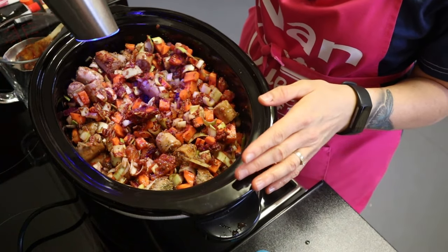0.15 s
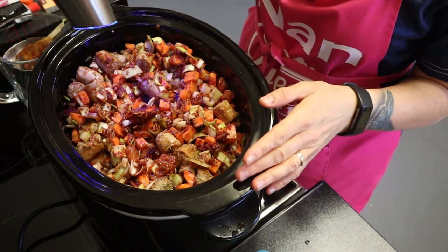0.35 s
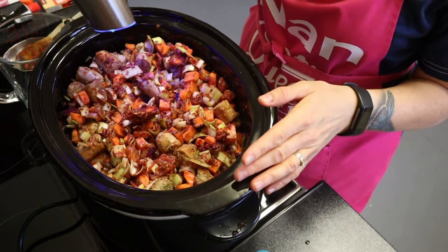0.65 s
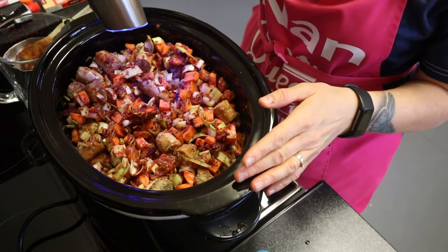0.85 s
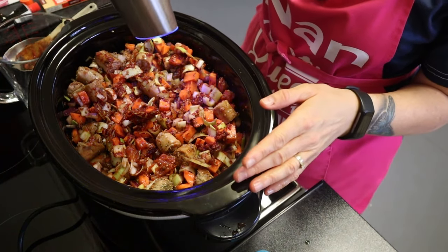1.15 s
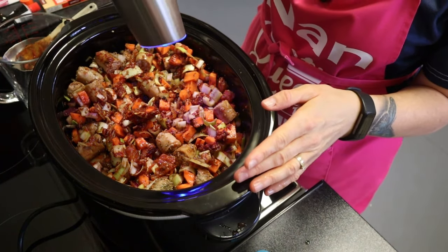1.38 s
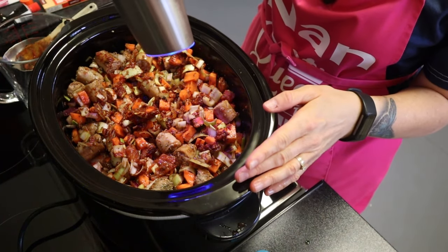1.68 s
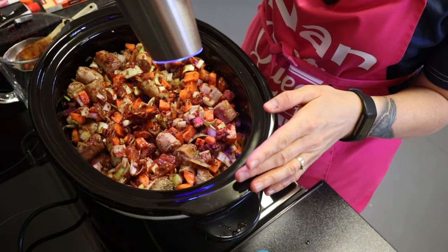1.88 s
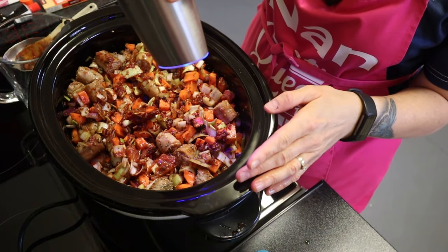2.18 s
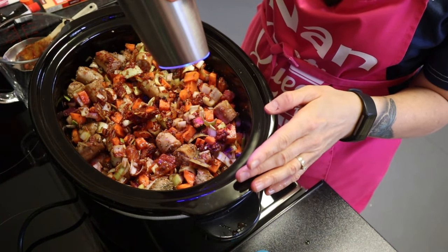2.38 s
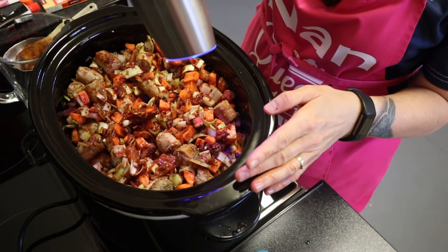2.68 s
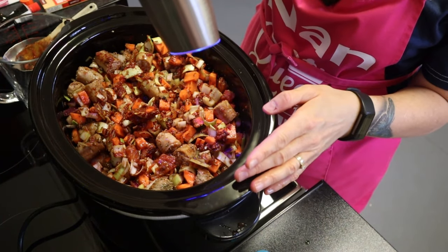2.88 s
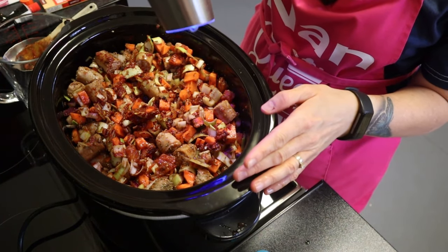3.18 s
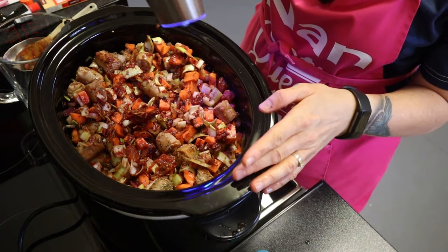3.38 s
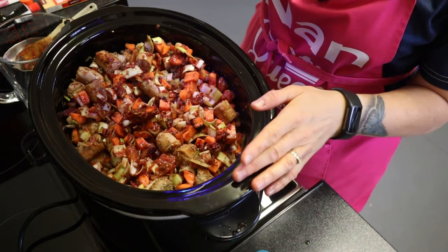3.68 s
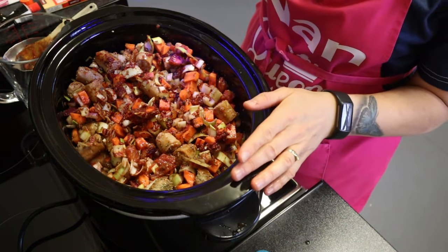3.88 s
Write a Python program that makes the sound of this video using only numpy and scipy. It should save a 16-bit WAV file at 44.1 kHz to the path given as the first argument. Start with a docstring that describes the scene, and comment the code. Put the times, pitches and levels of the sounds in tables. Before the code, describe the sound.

A battery pepper grinder whirs steadily up close, its rough motor whine wavering and sagging under load while peppercorns rasp, crackle and crack.

```python
"""A battery pepper grinder runs over a pot in a kitchen, close to a mono microphone.
From the start a small motor hums, gears whine and rattle the housing, and the burr rasps over faint room noise.
The first corn cracks just before half a second. From about 1.1 to 1.8 s the load drags the pitch down deeply,
and slipping gears jolt the housing, jammed corns squeal and more corns crack. The motor recovers, one last
corn cracks near 2.5 s, the pitch sags again around 3 s, and the motor is turning fast at the end."""
import sys
import numpy as np
from scipy import signal
from scipy.fft import rfft, irfft, next_fast_len
from scipy.io import wavfile
from scipy.ndimage import uniform_filter1d

SR = 44100
rng = np.random.default_rng(int(sys.argv[2]) if len(sys.argv) > 2 else 0)


def generate_wav(signal):
    """Clip the signal to [-1, 1] and save it as 16-bit WAV at the path in sys.argv[1]."""
    frames = np.transpose(np.atleast_2d(signal))
    scaled = np.clip(frames, -1, 1) * 32767
    pcm = np.round(scaled).astype(np.int16)
    wavfile.write(sys.argv[1], SR, pcm)


N = 178153
TIME = np.arange(N) / SR
GEAR_RATIO, GEAR_TEETH = 4 / 9, 15  # gear turns per shaft turn, teeth on that gear


def undb(db):
    """Turn decibels into a gain."""
    return 10 ** (np.asarray(db) / 20)


def unit(x):
    """Scale a sound to an average (rms) level of 1."""
    return x / np.sqrt(np.mean(x ** 2))


def curves(table):
    """Join the points of each column of a (time [s], ...) table with straight lines."""
    times, *columns = np.transpose(table)
    return [np.interp(TIME, times, column) for column in columns]


def response(hz, points):
    """Look up the level [dB] that a (frequency [Hz], level [dB]) table gives to a moving tone."""
    table_hz, db = np.transpose(points)
    return np.interp(np.log(hz), np.log(table_hz), db)


def walk(hz):
    """Drift at random around zero with spread 1, mostly slower than hz."""
    size = next_fast_len(N, real=True)
    f = np.fft.rfftfreq(size, 1 / SR)
    spectrum = rfft(rng.standard_normal(size)) / (1 + (f / hz) ** 2)
    return unit(irfft(spectrum, size)[:N])


def hold(start, length):
    """Rise, hold and let go, with 0.021 s ramps centred on the start and the end."""
    distance_inside = np.minimum(TIME - start, start + length - TIME)
    return np.clip(distance_inside / 0.021 + 0.5, 0, 1)


def swell(centre, length):
    """Rise and fall smoothly; the length is taken at half height."""
    return np.cos(np.pi / 2 * np.clip((TIME - centre) / length, -1, 1)) ** 2


def colour(x, points, size=4096):
    """Filter to a (frequency [Hz], level [dB]) spectrum, with no sound ahead of its cause."""
    hz, db = np.transpose(points)
    f = np.fft.rfftfreq(size, 1 / SR) + 1
    gain = undb(np.interp(np.log(f), np.log(hz), db))
    # folding the cepstrum (the spectrum of the log gain) puts the response as early as possible
    cepstrum = irfft(np.log(gain))
    cepstrum[1:size // 2] *= 2
    cepstrum[size // 2 + 1:] = 0
    impulse_response = irfft(np.exp(rfft(cepstrum)))
    return signal.fftconvolve(x, impulse_response)[:N]


def ring(x, modes):
    """Ring resonances side by side, each a narrow filter used twice to steepen it."""
    out = 0
    for hz, width_hz, db in modes:
        b, a = signal.iirpeak(hz, hz / width_hz, fs=SR)
        once = signal.lfilter(b, a, x)
        out = out + undb(db) * signal.lfilter(b, a, once)
    return out


def clicks(times, sizes):
    """Place impulses, each shared between its two nearest samples."""
    place = np.clip(times * SR, 0, N - 2)
    i = place.astype(int)
    later_share = place - i
    return np.bincount(i, sizes * (1 - later_share), N) + np.bincount(i + 1, sizes * later_share, N)


def grains(per_s, spread_db):
    """Scatter tiny fractures at random: many small, a few large."""
    size = np.minimum(rng.standard_exponential(N), 4)
    happens = rng.random(N) < per_s / SR
    return happens * undb(spread_db * size) * rng.choice([-1, 1], N)


def tone(cycles, rough, flutter_hz):
    """Sound a pitch whose strength and phase flutter at random."""
    flutter = 1 + rough * (walk(flutter_hz) + 1j * walk(flutter_hz))
    return unit(np.imag(flutter * np.exp(2j * np.pi * (cycles + rng.random()))))


def room(x, wet_db, t60=0.45, count=7):
    """Add the short tail of pot and walls, crossfading between count tails as the hand moves."""
    t = TIME[:SR // 3]
    out = x
    for k, draw in enumerate(rng.standard_normal((count, len(t)))):
        tail = draw * np.exp(-np.log(1000) * t / t60) * (t > .002)
        tail = tail / np.linalg.norm(tail)
        share = np.sqrt(np.clip(1 - np.abs(np.linspace(0, count - 1, N) - k), 0, 1))
        out = out + undb(wet_db) * signal.fftconvolve(x * share, tail)[:N]
    return out


def burr_load(shaft_hz):
    """Pepper's drag holds the speed down and is greatest while the motor is still slowing."""
    free_hz, sag_hz, inertia_s = 233.5, 67.7, 0.061  # a steady sag of sag_hz below free_hz is load 1
    slowing = -uniform_filter1d(np.gradient(shaft_hz) * SR, size=SR // 16)
    return (free_hz - shaft_hz + inertia_s * slowing) / sag_hz


def loaded(free_db, added_db, load):
    """Give a part's level [dB]: its level running free plus what full load adds."""
    return free_db + added_db * load


# hum of the unbalanced shaft: (shaft speed [Hz], level [dB])
HUM_LEVEL = [(175, -65.5), (205, -61.5), (230, -55)]
# motor's magnetic pull, set by its mount: (pitch [Hz], level before the slow drift [dB])
COGGING_LEVEL = [(520, -42.5), (545, -45.5), (562, -51.5), (578, -44.5), (615, -40), (662, -38.5),
                 (685, -40), (710, -42.5)]


def motor(turns, shaft_hz, load, drift_db):
    """Unbalance hums once a turn; the three poles pull three times a turn, less evenly under load."""
    hum = undb(response(shaft_hz, HUM_LEVEL)) * tone(turns, rough=0.04, flutter_hz=30)
    cogging_db = response(3 * shaft_hz, COGGING_LEVEL) + drift_db
    cogging = undb(cogging_db) * tone(3 * turns, rough=0.12 + 0.12 * load, flutter_hz=40)
    return hum + cogging


# weak steady gear tones: (multiple of the shaft speed [ratio], level before binding [dB])
WEAK_GEAR_TONES = [(46 / 9, -54), (6, -55), (56 / 9, -56), (68 / 9, -56), (8, -55), (92 / 9, -56)]
# tooth mesh, its sidebands and shaft orders: tone name -> multiple of the shaft speed [ratio]
GEAR_TONES = {"mesh": 20 / 3, "sideband": 64 / 9, "upper sideband": 73 / 9, "strain": 124 / 9, "4th": 4,
              "5th": 5, "7th": 7, "8th": 8, "9th": 9}
# gears bite and one tone sings out: (start [s], length [s], tone name, level before binding [dB])
GEAR_BITES = [(0, 0.12, "mesh", -36.5), (0.196, .06, "mesh", -35.5), (0.646, 0.069, "mesh", -34.5),
              (0.915, 0.068, "mesh", -33.5), (0.992, .1, "mesh", -38.5), (1.089, 0.16, "mesh", -33),
              (1.236, .09, "mesh", -45), (1.46, 0.12, "mesh", -40.5), (2.106, 0.072, "mesh", -28.5),
              (2.191, .12, "mesh", -35.5), (2.315, .24, "mesh", -31.5), (2.671, 0.087, "mesh", -39),
              (2.84, 0.39, "mesh", -40), (0.053, 0.12, "7th", -35), (.195, 0.23, "7th", -36.5),
              (.44, 0.21, "7th", -34), (0.625, 0.36, "7th", -36.5), (1.163, 0.08, "7th", -39),
              (1.47, 0.066, "7th", -36.5), (1.816, 0.074, "7th", -33.5), (2.085, 0.54, "7th", -39.5),
              (2.66, 0.23, "7th", -39.5), (3.251, .16, "7th", -39), (3.42, .62, "7th", -43.5),
              (.44, 0.064, "sideband", -44), (0.647, 0.043, "sideband", -36), (.92, 0.052, "sideband", -42),
              (1.122, .12, "sideband", -32.5), (1.25, 0.091, "sideband", -36.5),
              (1.47, 0.23, "sideband", -43), (2.117, 0.15, "sideband", -40),
              (2.354, 0.062, "sideband", -37), (2.494, 0.078, "sideband", -36),
              (2.58, 0.64, "sideband", -42.5), (3.635, 0.09, "sideband", -37.5),
              (1.432, 0.086, "upper sideband", -37.5), (1.645, 0.088, "upper sideband", -35),
              (3.021, 0.076, "upper sideband", -36), (2.599, 0.169, "8th", -40), (2.92, 0.25, "8th", -45),
              (.33, 0.17, "9th", -46), (.58, .09, "9th", -45), (.848, 0.13, "9th", -44),
              (1.43, .25, "9th", -38), (2.868, 0.26, "9th", -47), (3.6, 0.53, "9th", -46.5),
              (1.227, .14, "strain", -43), (1.435, .23, "strain", -43), (.96, .16, "4th", -50),
              (2.15, 0.73, "4th", -52), (3.3, .7, "4th", -62), (0.278, 0.2, "5th", -45.5),
              (0.527, 0.21, "5th", -44.5), (0.751, 0.11, "5th", -44), (1.835, 0.094, "5th", -44),
              (3.379, 0.23, "5th", -46.5)]


def gear_whine(turns, load):
    """Mesh tones and shaft orders take turns to sing as gears bite; backlash roughens them under load."""
    free_rough, loaded_rough = 0.16, 0.6
    rough = free_rough + (loaded_rough - free_rough) * load
    out = sum(undb(db) * tone(k * turns, rough=0.39, flutter_hz=8.9) for k, db in WEAK_GEAR_TONES)
    for name, order in GEAR_TONES.items():
        gain = sum(undb(db) * hold(s, length) for s, length, which, db in GEAR_BITES if which == name)
        if name in ("mesh", "7th"):
            gain = np.maximum(gain, undb(-44))  # these two never fall silent between bites
        # backlash smears the higher tones more widely
        out = out + gain * tone(order * turns, rough, flutter_hz=9 * order)
    return out


def tooth_blows(turns, wear_db, scatter_db, slack):
    """Each tooth lands with its own error, repeating every gear turn, plus some loose play."""
    teeth = turns * GEAR_RATIO * GEAR_TEETH
    n = np.arange(int(teeth[-1]))
    wear = rng.standard_normal((GEAR_TEETH, 2))[n % GEAR_TEETH]
    play = rng.standard_normal((N // 10, 2))[n]
    # column 0 shifts the moment of a blow, column 1 its strength
    times = np.interp(n + 0.25 * wear[:, 0] + slack * play[:, 0], teeth, TIME)
    return clicks(times, undb(wear_db * wear[:, 1] + scatter_db * play[:, 1]))


# colour of the struck plastic housing: (frequency [Hz], relative level [dB])
HOUSING_COLOUR = [(150, -81.5), (300, -18), (400, -37), (490, -14.5), (560, -11.5), (660, -9.5), (780, -19),
                  (920, -9), (1100, -7.5), (1400, -1), (1650, 1.5), (1850, -6.5), (2100, -9.5),
                  (3200, -37.5)]
# modes that chatter when gears strain: (frequency [Hz], width of one filter pass [Hz], relative level [dB])
CHATTER_MODES = [(2208, 400, 4.5), (2170, 18, -24), (2491, 85, 3), (2650, 300, -4), (2960, 830, -11)]


def gear_rattle(turns, rattle_db, chatter_db):
    """Tooth blows ring the housing; under load they also wake its higher modes."""
    rattle = colour(tooth_blows(turns, wear_db=0.5, scatter_db=2.0, slack=0.37), HOUSING_COLOUR)
    chatter = ring(tooth_blows(turns, wear_db=-0.5, scatter_db=1.5, slack=0.18), CHATTER_MODES)
    rattle = undb(rattle_db) * unit(room(rattle, wet_db=-7.0))
    return rattle + undb(chatter_db) * unit(room(chatter, wet_db=-9))


def binding(turns, load):
    """The driven gear binds once per turn, harder under load; short-term power stays near 1."""
    free_swing_db, loaded_swing_db = 1, 2.8
    swing_db = free_swing_db + (loaded_swing_db - free_swing_db) * load
    gain = undb(swing_db * (np.sin(2 * np.pi * GEAR_RATIO * turns) + 0.14 * walk(63)))
    return gain / np.sqrt(uniform_filter1d(gain ** 2, size=SR // 12))


def wander(x):
    """Neighbouring regions of the hiss swell and fade at random, independently."""
    spread_db, pace_hz = 1.1, 7
    out = 0
    for edge_hz in (4900, 5900, 7100):
        low = signal.sosfiltfilt(signal.butter(6, edge_hz, fs=SR, output="sos"), x)
        out = out + low * undb(spread_db * walk(pace_hz))
        x = x - low
    return out + x * undb(spread_db * walk(pace_hz))


# colour of the burr and steel sleeve: (frequency [Hz], relative level [dB])
SLEEVE_COLOUR = [(1500, -30), (2400, -2.5), (3000, -4), (3600, -6), (4000, 0), (4450, -1), (5200, 2),
                 (5800, 2), (6500, 1), (7200, 2), (8000, -11.5), (9800, -18), (12000, -21), (15500, -35)]
# ringing of the sleeve, shifting as corns lodge: (time [s], centre pitch [Hz], extra level [dB])
SLEEVE_RINGING = [(0, 6380, 1), (.27, 6425, 5), (.73, 6104, 0.5), (.92, 6410, 1), (1.35, 6410, 5),
                  (1.7, 6410, 0.5), (2.1, 6620, 4), (2.45, 6570, 2), (3.3, 6308, 1), (3.7, 6557, -2),
                  (4.04, 6290, 4)]


def burr(turns, rasp_db, sing_db):
    """Scrapes rasp through the sleeve, bunched by the shake of the shaft, and keep it ringing."""
    scrapes = grains(14000 * (1 + 0.23 * np.cos(2 * np.pi * turns)), spread_db=2.5)
    # the driven gear leans on the burr once per turn, with a quick, uneven flutter
    lean = undb(1.2 * np.sin(2 * np.pi * GEAR_RATIO * turns) + 0.7 * walk(31))
    rasp = wander(colour(scrapes * lean, SLEEVE_COLOUR))
    rasp = undb(rasp_db) * unit(room(rasp, wet_db=-6.5))
    sing_hz, lodged_db = curves(SLEEVE_RINGING)
    sing = undb(sing_db + lodged_db) * tone(np.cumsum(sing_hz) / SR, rough=5.7, flutter_hz=280)
    # a lower sleeve mode rings faintly, its level wandering at random
    low_ring_db = rasp_db - 16.0 + 2 * walk(3.3)
    low_ring = undb(low_ring_db) * tone(4500 * TIME, rough=11, flutter_hz=174)
    return rasp + lean * (sing + low_ring)


# coarse pieces in the burr:
# (centre [s], length at half height [s], extra rasp [dB], extra rattle [dB], extra chatter [dB])
COARSE_PIECES = [(.02, .075, 0.5, 5, 3), (.44, .06, 1.5, 2.5, -5), (.67, 0.11, 1.5, 1.5, -1),
                 (.95, .06, 2, 2.5, -5), (1.17, 0.14, 2.5, 1, 4.5), (1.28, 0.074, 1, 1, 2),
                 (1.47, 0.081, 4.5, 1.5, 3), (1.55, 0.062, 1, -1, -1), (1.61, 0.052, 0.7, 1, -6),
                 (1.69, 0.067, 2, -5, 4.5), (1.735, 0.039, 1, 5.5, 2), (1.93, 0.069, 4, 4.5, -4),
                 (2.15, 0.11, 0.5, 1.5, 0), (2.38, 0.093, 2, 3.5, 1), (2.52, .05, -1, 2, 6),
                 (2.65, 0.097, 2, 0.5, 8), (2.9, 0.24, 1.5, 0, 6), (3.06, 0.044, -1.5, -2, 3),
                 (3.68, .2, 1.5, 3, -2.5), (3.88, 0.098, 2, 3, -2.5)]


def crunches():
    """Each coarse piece swells and fades; gives the extra dB of rasp, of rattle and of chatter."""
    return sum(np.outer(extra_db, swell(s, length)) for s, length, *extra_db in COARSE_PIECES)


# crumbling corns heard through the housing: (frequency [Hz], relative level [dB])
CRUSH_COLOUR = [(300, -37), (700, -20), (1050, 1.5), (1750, 0.5), (2300, -6), (2750, -1), (3200, -9),
                (6000, -35.5)]


def crush(crush_db):
    """Under heavy load corns crumble in a dense run of fractures that sound through the housing."""
    fractures = colour(grains(2200, spread_db=3.0), CRUSH_COLOUR)
    return undb(crush_db) * unit(room(fractures, wet_db=-7.5))


# fine crackle as the pepper feeds in: (time [s], extra level [dB])
PEPPER_FEED = [(0, -0.5), (.4, 2), (.6, -0.5), (1.0, 1), (1.15, -2), (1.5, -2), (1.83, -1.5), (2.0, 3),
               (2.3, -1.5), (2.45, 1), (2.9, -0.5), (3.28, -0.5), (3.62, 1.5), (3.78, -0.5), (4.04, 3)]
# colour of that crackle: (frequency [Hz], relative level [dB])
CRACKLE_COLOUR = [(3000, -36), (6000, 2), (7800, 15), (9000, 9), (10200, 3), (11800, -2.5), (13500, -6),
                  (15500, -29)]


def crackle(turns, dust_db):
    """Fine splinters at the mouth of the burr pulse once per gear turn and follow the uneven feed."""
    pulse = undb(2.0 * np.sin(2 * np.pi * GEAR_RATIO * turns) + 0.82 * walk(40))
    splinters = colour(pulse * grains(7500, spread_db=5.5), CRACKLE_COLOUR)
    return undb(dust_db + curves(PEPPER_FEED)[0]) * unit(room(splinters, wet_db=-1.5))


# kitchen background: (frequency [Hz], relative level [dB])
KITCHEN_COLOUR = [(20, -16), (32, -20), (55, -17), (110, 0), (200, 0.5), (500, 6.5), (2000, -21),
                  (12000, -26)]


def kitchen():
    """Faint room noise is coloured random hiss; mains hum is a steady 50 Hz tone."""
    air = undb(-64.5) * unit(colour(rng.standard_normal(N), KITCHEN_COLOUR))
    hum = undb(-78.5) * unit(np.sin(2 * np.pi * 50 * TIME))
    return air + hum


# single sleeve resonances swell up:
# (centre [s], length at half height [s], pitch [Hz], flutter rate that widens it [Hz], level [dB])
RESONANCE_SWELLS = [(.14, 0.081, 6260, 120, -41), (.25, 0.34, 6830, 220, -43), (.71, .09, 5820, 320, -42),
                    (.93, 0.17, 6320, 180, -40), (1.32, 0.1, 6350, 130, -43), (1.41, 0.17, 6930, 220, -40),
                    (1.6, .28, 5080, 70, -48), (1.92, 0.093, 6530, 180, -37.5), (2.06, .1, 6540, 120, -43),
                    (2.14, 0.065, 4890, 220, -39), (2.21, 0.12, 6760, 160, -43),
                    (2.76, 0.13, 6800, 200, -40), (2.89, 0.078, 4450, 120, -41),
                    (3.33, 0.27, 5860, 260, -39.5), (3.46, .14, 4450, 200, -41.5),
                    (3.67, .11, 7000, 400, -45), (3.97, .1, 4080, 59.94, -50)]


def sleeve_swells():
    """A corn dragged round the burr keeps one sleeve resonance ringing for a moment."""
    out = 0
    for s, length, hz, width_hz, db in RESONANCE_SWELLS:
        out = out + undb(db) * swell(s, length) * tone(hz * TIME, rough=4, flutter_hz=width_hz)
    return out


# cracking corns: (time [s], snap before colour and lift [dB], knock before modes and lift [dB], decay [s])
CORN_CRACKS = [(.447, -45, -22, .002), (.682, -33, -22, .002), (1.168, -33, -4, .0042),
               (1.234, -35, -22, .003), (1.288, -42, -12, .003), (1.3632, -22.5, -1, 0.0014),
               (1.6799, -31, -18, .004), (1.691, -34, -16, .005), (2.4969, -19, -7, 0.00083)]
# colour of a snap: (frequency [Hz], relative level [dB])
SNAP_COLOUR = [(100, -50), (500, -14), (2000, 6), (3500, -2), (6300, 9), (8200, 2.5), (11800, -6.5),
               (15500, -15)]
# housing modes of a knock: (frequency [Hz], width of one filter pass [Hz], relative level [dB])
CRACK_KNOCK_MODES = [(525, 27, -2.5), (804, 180, -3), (1317, 320, -13), (2830, 2600, -13.5)]


def cracks():
    """A corn splits with a sharp tick, a burst of splinters and trailing crumbs, and jolts the housing."""
    times, snap_db, knock_db, decays = np.transpose(CORN_CRACKS)
    snap = clicks(np.round(times * SR) / SR, undb(snap_db))
    for s, db, decay in zip(times, snap_db, decays):
        age = np.abs(TIME - s)
        crumbs = undb(-17) * np.exp(-age / 0.011)
        burst = np.exp(-age / decay) + crumbs
        snap = snap + undb(db) * rng.choice([-1, 1], N) * (TIME > s) * burst
    knock = ring(clicks(times, undb(knock_db)), CRACK_KNOCK_MODES)
    return room(undb(1.0) * colour(snap, SNAP_COLOUR) + undb(13.0) * knock, wet_db=-5.5, count=3)


# slipping gears jolt the housing: (time [s], strength before colour and lift [dB])
GEAR_SLIPS = [(1.1365, -6), (1.158, 3), (1.1885, -8), (1.2228, -3), (1.275, 2), (1.6434, 5), (1.666, -7),
              (1.6795, 1), (1.729, 3)]


def jolts():
    """A slipping tooth lands hard and rings the housing once."""
    times, db = np.transpose(GEAR_SLIPS)
    return room(undb(4.0) * colour(clicks(times, undb(db)), HOUSING_COLOUR), wet_db=-3, count=3)


# jammed corns make a housing mode squeal: (start [s], length [s], pitch [Hz], level before binding [dB])
JAM_SQUEALS = [(1.262, 0.058, 2180, -36), (1.673, 0.041, 2175, -39), (1.68, .075, 2520, -41)]


def squeals():
    """A jammed corn makes a brief rough tone that stays on one housing mode whatever the speed."""
    out = 0
    for s, length, hz, db in JAM_SQUEALS:
        out = out + undb(db) * hold(s, length) * tone(hz * TIME, rough=0.8, flutter_hz=70)
    return out


# motor shaft speed: (time [s], turns per second [Hz])
SHAFT_SPEED = [(0.0, 219.7), (0.06, 217.8), (0.17, 229), (0.28, 221.7), (0.42, 229.9), (0.47, 219.8),
               (0.53, 221), (0.63, 228.7), (0.73, 216.1), (0.84, 233.8), (0.92, 237.6), (0.99, 232.2),
               (1.12, 228.1), (1.17, 210.5), (1.22, 206.2), (1.28, 191.4), (1.37, 174), (1.44, 191.3),
               (1.55, 191.9), (1.63, 198.1), (1.72, 175.8), (1.88, 224.6), (2.07, 236), (2.17, 214),
               (2.33, 222.8), (2.45, 222.3), (2.65, 201.8), (2.82, 209.7), (2.93, 191.1), (3.0, 192.6),
               (3.08, 186.7), (3.25, 207.1), (3.6, 226), (3.8, 235.6), (4.04, 235.7)]
# slow drift as the hand moves the grinder: (time [s], extra cogging [dB], extra chatter [dB], extra rasp [dB])
HAND_DRIFT = [(0, -0.5, -0.5, 2), (.6, -5, 5.5, -1.5), (.85, -1, 3.5, 0.5), (1.5, -4, 5, -2.5),
              (2.0, -2, 5.5, 1.5), (2.35, 1, 3, 3), (2.9, -2, -7.5, -1), (3.45, -3.5, 7, 1.5),
              (4.04, -1, 9, 0.5)]


def scene():
    """One shaft drives every part of the grinder, and the load on it changes how loud many of them are."""
    shaft_hz = curves(SHAFT_SPEED)[0]
    turns = np.cumsum(shaft_hz) / SR
    load = burr_load(shaft_hz)
    cogging_drift, chatter_drift, rasp_drift = curves(HAND_DRIFT)
    crunch_db, shake_db, strain_db = crunches()

    rattle_db = loaded(-37.5, 3, load) + shake_db
    chatter_db = loaded(-49.5, 8, load) + chatter_drift + strain_db
    rasp_db = loaded(-38, 6.5, load) + rasp_drift + crunch_db
    sing_db = loaded(-45, -1, load) + crunch_db
    crush_db = loaded(-54, 20.5, load)
    dust_db = loaded(-46.5, 2, load) + crunch_db

    hum = motor(turns, shaft_hz, load, cogging_drift)
    gears = gear_whine(turns, load) + gear_rattle(turns, rattle_db, chatter_db) + squeals()
    gears = binding(turns, load) * gears
    pepper = burr(turns, rasp_db, sing_db) + crush(crush_db) + crackle(turns, dust_db)
    pepper = pepper + sleeve_swells() + cracks()
    mono = hum + gears + pepper + kitchen() + jolts()
    return np.array([mono, mono])


def record(dry):
    """The recorder drops the deepest rumble and cuts the top steeply."""
    thinned = signal.sosfilt(signal.butter(4, 36, "high", fs=SR, output="sos"), dry)
    # 0.1 dB ripple below 15680 Hz, 80 dB down above the steep edge
    return signal.sosfilt(signal.ellip(12, .1, 80, 15680, fs=SR, output="sos"), thinned)


dry = scene()
out = record(dry)
generate_wav(out)
```